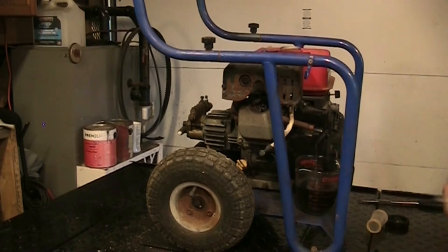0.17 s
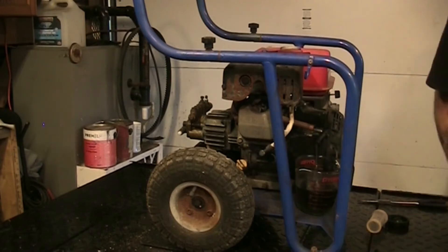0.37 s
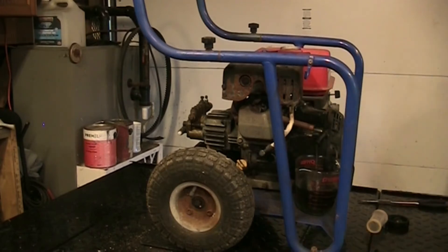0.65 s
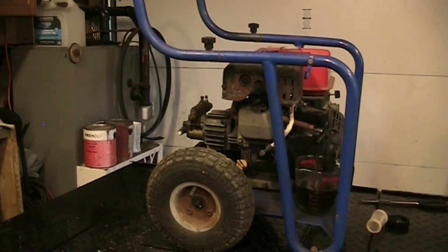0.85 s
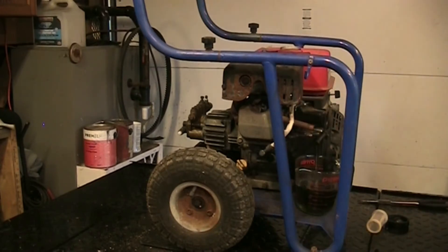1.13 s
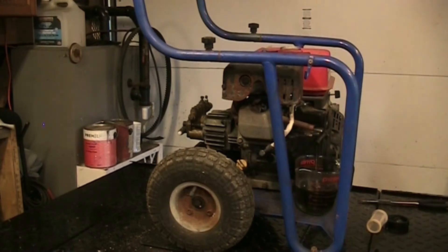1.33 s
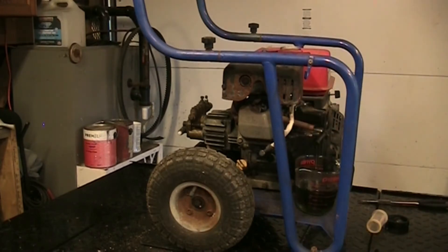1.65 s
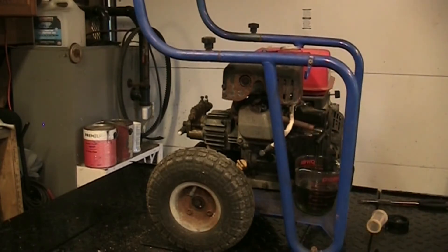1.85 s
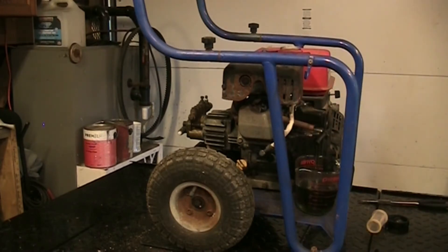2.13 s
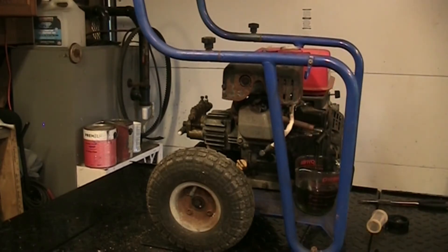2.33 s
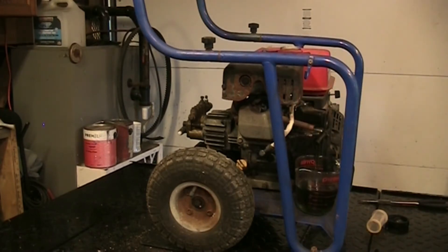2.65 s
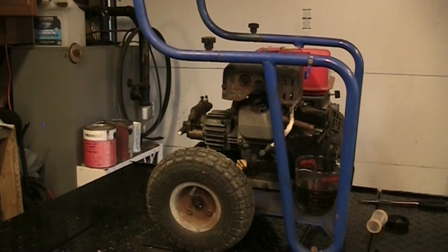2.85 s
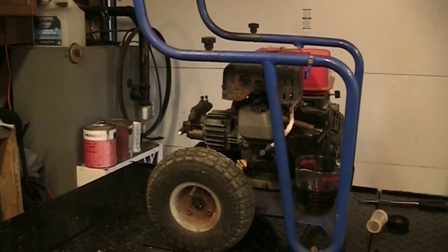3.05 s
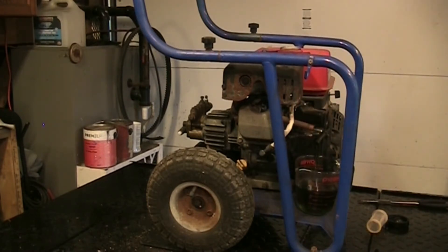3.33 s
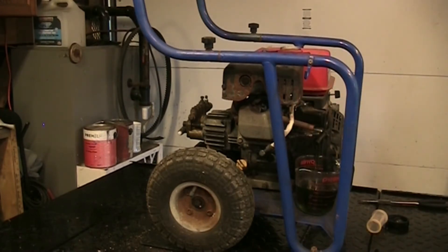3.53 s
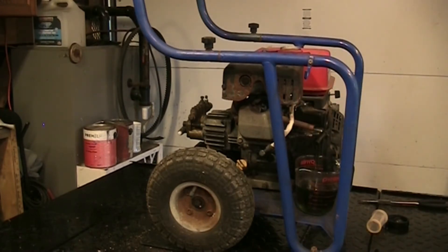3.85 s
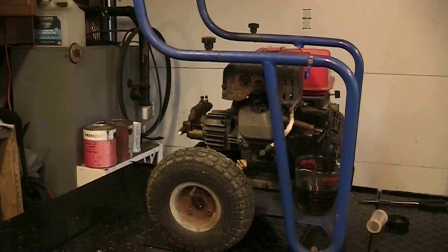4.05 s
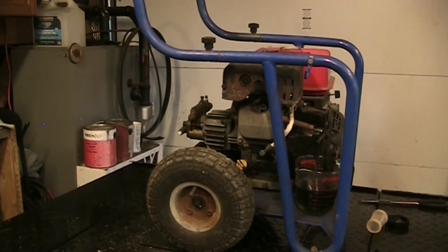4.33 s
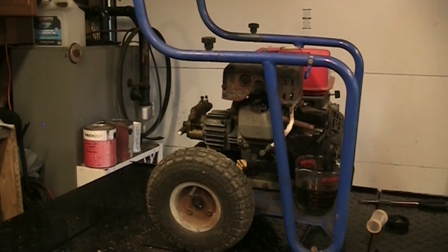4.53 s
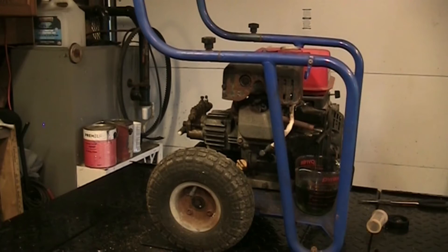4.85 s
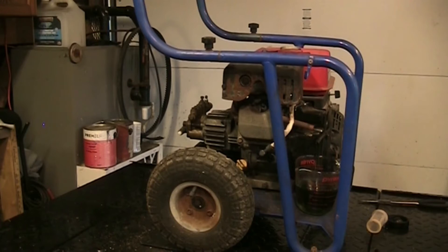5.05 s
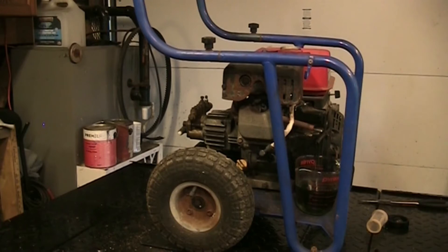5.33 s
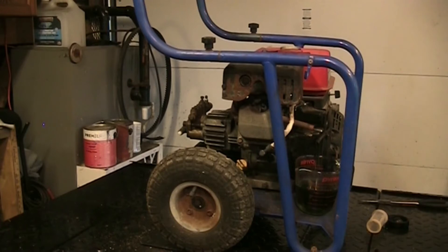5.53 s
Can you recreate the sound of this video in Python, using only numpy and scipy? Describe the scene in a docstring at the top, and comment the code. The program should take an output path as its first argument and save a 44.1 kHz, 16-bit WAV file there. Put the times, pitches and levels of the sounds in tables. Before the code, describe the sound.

In a small, quiet workshop, liquid drips from an engine into a glass cup: bright plinks and dry ticks at first, then softer bubbly patter. Someone nearby bumps and steps; two hard knocks stand out near 1.3 and 3.3 seconds. Just after 5 seconds a metal tool scrapes down among small thuds. Wide stereo camera microphone, short hard room echo, faint hiss.

```python
"""A quiet workshop, small and hard-walled: fuel drips from a small engine into a glass cup.
Each drop traps bubbles that pip as gliding sines and rings the glass; splash ticks add bright spray.
Someone nearby steps and knocks (ringing boards and a crack) and sets a metal tool down (scrape and ring).
Behind lie faint room hiss, a high rustle and a wavering low hum. Random decaying echoes smear the blows
and drips on their way to a camera's wide stereo microphone."""
import sys
import numpy as np
from scipy import signal
from scipy.fft import rfft, irfft, next_fast_len
from scipy.io import wavfile
from scipy.ndimage import uniform_filter1d

SR = 44100
rng = np.random.default_rng(int(sys.argv[2]) if len(sys.argv) > 2 else 0)


def unload_wav(signal):
    """Save mono or channel-first audio to the path in sys.argv[1] as 16-bit WAV at rate SR, clipped to [-1, 1]."""
    wavfile.write(
        sys.argv[1],
        SR,
        np.round(np.clip(np.atleast_2d(signal).T, -1, 1) * 32767).astype(np.int16),
    )


N = 250387
SIZE = 16384  # samples kept of each single sound and echo response
T = np.arange(SIZE) / SR


def undb(db):
    """Turn decibels into an amplitude factor."""
    return 10 ** (np.asarray(db) / 20)


def fade(t60):
    """Exponential decay that falls 60 dB in t60 seconds."""
    return np.exp(-np.log(1000) * T / t60)


def colour(x, table):
    """Filter along the last axis by (frequency [Hz], gain [dB]) points, joined on a log frequency axis."""
    hz, db = np.transpose(table)
    f = np.maximum(np.fft.rfftfreq(x.shape[-1], 1 / SR), 1)
    gain_db = np.interp(np.log(f), np.log(np.maximum(hz, 1)), db)
    return irfft(rfft(x) * undb(gain_db), x.shape[-1])


def unit(x):
    """Scale to an RMS of one."""
    return x / np.sqrt(np.mean(x ** 2))


def walk(rate):
    """Random levels held 1 / rate s and slewed twice."""
    hold = int(SR / rate)
    steps = np.repeat(rng.standard_normal(N // hold + 1), hold)
    return uniform_filter1d(uniform_filter1d(steps, hold), hold)[:N]


def ring(modes, scatter_db, swell=.1):
    """Decaying sines that swing up over swell cycles; every blow stirs them in another mix."""
    chance = rng.standard_normal((len(modes), 2))
    total = 0
    for (hz, db, t60), (stir, sign) in zip(modes, chance):
        swing = np.sign(sign) * np.sin(2 * np.pi * hz * T) * (1 - np.exp(-T * hz / swell))
        total = total + undb(db + scatter_db * stir) * swing * fade(t60)
    return total


def bubble(hz, ring_s, glide=0.0067):
    """A trapped bubble swells for a cycle or two, pips and rises a little as it nears the surface."""
    swell = 1 - np.exp(-T * hz / 0.3)
    rising_time = T + glide * T ** 2 / (2 * ring_s)
    return swell * np.sin(2 * np.pi * hz * rising_time) * fade(max(ring_s, .002))


FOLLOWER_DB, FOLLOWER_DETUNE = -10, 0.078  # level of trailing bubbles, full width of their relative pitch spread
FOLLOWER_S = .03  # they trail by 0.18 to 1.18 times this


def burst(hz, ring_s, glide):
    """A bubble and two smaller ones that follow it, a little off its pitch."""
    followers = 0
    for delay, detune, level in rng.random((2, 3)):
        small = bubble(hz * (1 + FOLLOWER_DETUNE * (detune - .5)), 0.012, glide)
        followers = followers + np.roll(small, int((0.18 + delay) * FOLLOWER_S * SR)) * level
    return bubble(hz, ring_s, glide) + undb(FOLLOWER_DB) * followers


# glass cup: ring of the cup before its level is set: (frequency [Hz], level [dB], t60 [s])
GLASS = [(2360, -14, 0.025), (3000, -25.5, 0.048), (3450, -17.5, 0.11), (3580, -2, 0.019),
         (5100, -26, 0.0069), (6940, -8, 0.0077)]
# ring against the bubble [dB], weaker for bubbles below the cup's note [Hz]
GLASS_DB, GLASS_DB_PER_OCTAVE, CUP_NOTE_HZ = -8.5, 5.5, 3520
# drops in the cup that stand out: (time [s], level [dB], bubble pitch [Hz], bubble ring t60 [s])
DROPS = [(0.0492, -22, 3730, 0.031), (0.052, -39.5, 1730, 0.022), (0.1126, -37.5, 3610, 0.013),
         (0.1584, -37.5, 2360, 0.018), (0.1987, -42, 1670, .022), (0.2184, -34.5, 1790, 0.068),
         (0.2339, -33, 2254, 0.043), (0.236, -41, 3670, 0.015), (0.2636, -27, 1182, 0.049),
         (0.2861, -28.5, 1290, 0.027), (0.3756, -46, 2360, .021), (0.396, -43, 1474, 0.041),
         (0.4889, -34.5, 1236, 0.014), (0.7656, -47, 4190, .054), (0.871, -37.5, 1306, 0.078),
         (0.8959, -33.5, 1460, 0.029), (1.0003, -35, 3450, .014), (1.0409, -38.5, 3580, 0.027),
         (1.1151, -34.5, 2360, 0.027), (1.195, -41.5, 2360, 0.0064), (1.409, -35, 2360, 0.013),
         (1.4638, -29.5, 3600, 0.02), (1.5285, -43, 2200, 0.014), (1.599, -37.5, 3650, 0.02),
         (1.6114, -40.5, 2110, 0.017), (1.645, -39.5, 1772, 0.09), (1.8218, -44.5, 3850, 0.016),
         (1.8828, -36.5, 2350, 0.028), (2.043, -45, 1170, 0.046), (2.2761, -37.5, 2870, 0.02),
         (2.35, -48.5, 2550, 0.028), (2.372, -53, 3150, .016), (2.3935, -45.5, 3700, 0.04),
         (2.431, -51, 2500, 0.025), (2.608, -41, 2520, .023), (2.76, -36, 3000, 0.019),
         (2.8183, -45, 3020, 0.012), (2.8806, -47.5, 2480, .015), (2.9357, -48.5, 3450, .026),
         (3.0356, -43, 2580, .021), (3.0585, -43, 3450, 0.031), (3.18, -40, 3450, 0.035),
         (3.225, -43, 2000, 0.004), (3.503, -45, 3100, .023), (3.5594, -43, 3000, 0.031),
         (3.6617, -42.5, 3580, .018), (3.7314, -46.5, 3580, 0.023), (3.8648, -36.5, 2360, 0.03),
         (4.0002, -50, 2530, 0.032), (4.0871, -48.5, 3480, 0.022), (4.14, -42.5, 3000, 0.057),
         (4.1625, -40, 3450, 0.017), (4.3919, -44.5, 3150, 0.013), (4.4498, -46.5, 3340, .018),
         (4.6738, -43, 3564, 0.029), (4.8405, -46, 2690, 0.019), (4.922, -43.5, 3450, 0.034),
         (4.996, -47, 2900, 0.022), (5.3662, -44.5, 3520, 0.018), (5.4052, -42, 3550, 0.029),
         (5.472, -46, 3800, 0.016), (5.6443, -44, 3630, .018)]


def drops():
    """Each loud drop pips a burst of bubbles and rings the glass; heard almost central."""
    out = np.zeros((2, N))
    for s, db, hz, ring_s in DROPS:
        glass_db = GLASS_DB + GLASS_DB_PER_OCTAVE * min(np.log2(hz / CUP_NOTE_HZ), 0)
        drop = burst(hz, ring_s, glide=0.013) + undb(glass_db) * ring(GLASS, scatter_db=5.5)
        add(out, s, db, drop, echoes(wet_db=-27.5, pan_db=0.4, wide_db=-1.0))
    return out


# t60 of a tick at the middling level, growing for softer ones [per dB]
TICK_RING_S, TICK_RING_PER_DB, MIDDLING_TICK_DB = 0.0024, 0.1344, -42
SPRAY_DB = -12  # factor on the spray beside the tick's bubble
# fine spray over a splash: (frequency [Hz], gain [dB])
SPRAY = [(2500, -30), (5000, -58), (9000, 4.5), (14000, 3), (17000, -34)]
# splash ticks at the cup: (time [s], level [dB], centre pitch [Hz])
TICKS = [(0.0498, -32.5, 5800), (0.113, -47, 5400), (0.1995, -39, 7300), (0.2191, -36, 4740),
         (0.3192, -36.5, 6600), (0.3542, -51.5, 6640), (0.4382, -47, 5100), (0.6804, -35, 8430),
         (0.8968, -36.5, 3500), (0.458, -49, 6000), (0.9585, -47.5, 10400), (0.9912, -46.5, 7550),
         (1.071, -45, 7500), (1.0962, -39.5, 5100), (1.1596, -54, 6940), (1.2491, -53, 6600),
         (1.4648, -31.5, 5020), (1.5999, -40, 4600), (2.852, -56, 7000), (3.235, -56, 7000),
         (3.745, -51, 5100), (3.7983, -48.5, 6940), (3.9675, -51, 6270), (4.2755, -60, 6200),
         (4.3824, -62, 6800), (4.6642, -47, 6200), (4.691, -50.5, 5100), (5.017, -47, 7100),
         (5.472, -47.5, 4440), (5.5934, -51, 6860)]


def ticks():
    """A splash tick is a tiny short bubble under a coloured impulse of spray, a little to the right."""
    out = np.zeros((2, N))
    impulse = 1. * (T == T[20])
    spray = colour(impulse, SPRAY) * fade(0.0063)
    for s, db, hz in TICKS:
        ring_s = TICK_RING_S * np.exp(-TICK_RING_PER_DB * (db - MIDDLING_TICK_DB))
        tick = bubble(hz, ring_s) + undb(SPRAY_DB) * spray
        add(out, s, db, tick, echoes(wet_db=-28.5, pan_db=-2.0, wide_db=0.5))
    return out


PATTER_FROM_S = 1.8
PATTER_DB, PATTER_SPREAD_DB = -56, 2.5  # faintest blip; scale of the random rise above it
# pitches the small patter in the cup favours: (frequency [Hz])
CUP_HZ = [2490, 2840, 3100, 3400, 3280]


def patter():
    """Once the cup holds a pool, small bubble bursts fall at random times near its favoured pitches."""
    out = np.zeros((2, N))
    for when, loud, pitch, detune in rng.random((175, 4)):
        hz = CUP_HZ[int(pitch * len(CUP_HZ))] * (1 + 0.13 * (detune - .5))
        s = PATTER_FROM_S + when * ((N - 1) / SR - PATTER_FROM_S)
        db = PATTER_DB - PATTER_SPREAD_DB * np.log(1 - .95 * loud)
        blip = burst(hz, .016, glide=.14)
        add(out, s, db, blip, echoes(wet_db=-25, pan_db=0.0, wide_db=3.0))
    return out


CRACKLE_TO_S = 1.7


def crackle():
    """Fine high splash ticks while the cup is still nearly dry, a little to the left."""
    out = np.zeros((2, N))
    for when, loud, pitch in rng.random((30, 3)):
        tick = bubble(5500 * 2.23 ** pitch, 0.0047)
        add(out, when * CRACKLE_TO_S, -60 + 8 * loud, tick, echoes(wet_db=-25.5, pan_db=2.0, wide_db=-20.0))
    return out


def snap(t60):
    """A short noise burst flattened to an even spectrum, starting about 1 ms in."""
    noise = rng.standard_normal(SIZE) * fade(t60)
    spectrum = rfft(np.roll(noise, SR // 1000))
    return irfft(spectrum / np.abs(spectrum), SIZE)


BOARD_SWELL_CYCLES = 1.45  # low boards take longer to swing up
RATTLE_T60_S = .23
# floor and bench boards, before each blow colours them: (frequency [Hz], level [dB], t60 [s])
BOARDS = [(140, -1, .2), (226, -4, .18), (248, 0.1, .18), (301, -9, .16), (404, -1, .17), (447, -1, .16),
          (540, -6, .15), (624, -9, .16)]
# crack of a blow, before its brightness tilt: (frequency [Hz], gain [dB])
CRACK = [(410, -8), (700, -1), (1020, -4.5), (1330, -4.5), (4320, -12), (5540, -16), (6070, -17),
         (6830, -15), (12200, -31), (16000, -46)]
# steps and knocks nearby:
# (time [s], thud level [dB], crack above thud [dB], thud centre [Hz], crack brightness [dB])
KNOCKS = [(0.16, -35.5, -2.5, 450, 1), (0.691, -39, -4, 199, 25), (0.829, -35, -5, 153, -13),
          (0.947, -45.5, 6, 541, -7), (1.293, -8, -7.5, 372, 3), (1.778, -46, -40, 189, -2),
          (1.889, -19.5, -9.5, 373, -3.5), (2.059, -37, -39, 143, -1), (2.162, -36.5, 4.5, 625, 0.5),
          (2.257, -42, 9, 634, -16), (2.507, -30, 7.5, 647, -6.5), (2.628, -39.5, -3, 240, -2),
          (2.673, -32, -6.5, 203, -1), (2.719, -37, -4, 140, -3), (3.337, -7.5, -9, 427, 1.3),
          (4.014, -38.5, -23, 810, 0.1), (4.168, -45.5, -5, 433, 7), (5.016, -31, -7, 370, -8),
          (5.085, -32.5, 4, 513, -6.5), (5.205, -29, -7.5, 457, -32)]


def knocks():
    """A blow rings and rattles the boards near its own pitch, and cracks, bright or dull."""
    out = np.zeros((2, N))
    for s, db, crack_db, hz, tilt_db in KNOCKS:
        push = [(40, -45), (hz / 2.96, -8), (hz, 0), (hz * 2.32, -10), (hz * 12, -40)]
        rattle = undb(8.5) * rng.standard_normal(SIZE) * fade(RATTLE_T60_S)
        boards = ring(BOARDS, scatter_db=3.0, swell=BOARD_SWELL_CYCLES)
        thud = colour(boards + rattle, sorted(push)) * (1 - np.exp(-T / 0.00041))
        crack = colour(colour(snap(.003), CRACK), [(700, -tilt_db), (12000, tilt_db)])
        crack = crack * fade(0.035) * (1 - np.exp(-T / 0.0018))
        thud_room = echoes(wet_db=-38, pan_db=-2.3, wide_db=3.0, lag=2, wall_db=-28.0)
        crack_room = echoes(wet_db=-23, pan_db=-0.5, wide_db=3, lag=2, wall_db=-20)
        add(out, s, db, thud, thud_room)
        add(out, s, db + crack_db, crack, crack_room)
    return out


# ring of the metal tool, before its level is set: (frequency [Hz], level [dB], t60 [s])
TOOL = [(2770, -2, .1), (3112, -4, .1), (3445, -3, .2), (5058, -3, .14), (5376, -3, .12), (6300, -5, .08)]
# scrape of the tool: (frequency [Hz], gain [dB])
TOOL_SCRAPE = [(470, -15), (800, -10.5), (2100, -4), (2770, 2.5), (4180, -10.5), (5510, 0), (8030, -11),
               (9570, -20.5), (10600, -19.5), (11400, -22), (13600, -21), (16000, -52)]
# the tool touches down nearby: (time [s], level [dB], ring against scrape [dB])
CLINKS = [(5.1073, -25, -29), (5.1849, -25.5, -12), (5.2069, -28, -13), (5.2324, -34, -15)]


def tool():
    """Metal modes ring briefly over a bright scrape of coloured noise."""
    out = np.zeros((2, N))
    for s, db, ring_db in CLINKS:
        scrape = colour(snap(0.013), TOOL_SCRAPE) * fade(0.06)
        scrape = scrape / np.abs(scrape).max()
        metal = ring(TOOL, scatter_db=2.0)
        add(out, s, db, scrape + undb(ring_db) * metal, echoes(wet_db=-21, pan_db=0.0, wide_db=4.5))
    return out


HISS_DB, HISS_SINK_DB_PER_S = -53, 0.74  # start level and steady fall of the room hiss
# room hiss in the middle of the stereo picture: (frequency [Hz], gain [dB])
HISS_MID = [(35, -101), (60, -0.5), (113, 0.5), (290, -4.5), (350, -7), (432, -3.5), (1990, -13.5),
            (3500, -20), (4320, -20.5), (5730, -21), (14000, -32), (15400, -32), (16500, -67)]
# room hiss at the sides: (frequency [Hz], gain [dB])
HISS_SIDE = [(35, -39), (60, -5), (252, -1.5), (559, -3.5), (1300, -9.5), (3500, -18), (6300, -22.5),
             (11600, -34), (12700, -66), (14300, -80), (16500, -51)]


def hiss():
    """Wide coloured room noise that wavers and slowly sinks."""
    n = next_fast_len(N)
    mid = unit(colour(rng.standard_normal(n), HISS_MID)[:N])
    side = unit(colour(rng.standard_normal(n), HISS_SIDE)[:N]) * undb(3.0)
    level_db = HISS_DB - HISS_SINK_DB_PER_S * np.arange(N) / SR
    return (mid + side * np.array([[1], [-1]])) * undb(level_db + 1.5 * walk(6.56))


RUSTLE_DB, RUSTLE_SINK_DB, RUSTLE_SINK_S = -57.5, 16, 1.35  # start, total fall, time constant of the fall
RUSTLE_FLICKER_DB = 5  # factor on a smoothed random walk


def rustle():
    """High noise, independent left and right, that dies down and flickers."""
    noise = rng.standard_normal((2, next_fast_len(N)))
    treble = unit(colour(noise, [(4000, 1), (7500, -15.0), (11000, -6.0), (16000, -22)])[:, :N])
    level_db = RUSTLE_DB - RUSTLE_SINK_DB * (1 - np.exp(-np.arange(N) / SR / RUSTLE_SINK_S))
    return treble * undb(level_db + RUSTLE_FLICKER_DB * walk(25.3))


# wavering hum in the background, before the left-right offset: (time [s], level [dB])
HUM = [(0.0, -64), (0.22, -55.5), (0.45, -63), (1.0, -63), (1.2, -55.5), (1.72, -55), (2.09, -73),
       (2.34, -60.5), (2.61, -75), (3.07, -68), (3.6, -75), (4.2, -77), (4.73, -71), (5.1, -70),
       (5.68, -80)]


def hum():
    """A low sine whose pitch and level waver, stronger on the right."""
    hum_hz = 47.5 + 3.65 * walk(23.4)
    tone = unit(np.sin(2 * np.pi * np.cumsum(hum_hz) / SR)) * undb(0.7 * walk(14))
    level_db = np.interp(np.arange(N) / SR, *np.transpose(HUM))
    return tone * undb(level_db + np.array([[-4.5], [3.0]]))


ROOM_T60_S, TREBLE_T60_S = 0.28, 0.22
WALL_S, WALL_DB = .0100, -7.5  # slap off the near wall
# echoes as the two microphone ports hear them, before each spot's width:
# (frequency [Hz], side above mid [dB])
ECHO_SIDE = [(100, -1), (400, -17), (1000, -15), (2500, -8.5), (6000, -5.5), (14000, -11)]


def echoes(wet_db, pan_db, wide_db, lag=0, wall_db=WALL_DB):
    """Stereo room response from one spot: direct sound, near-wall slap, clumpy echoes, treble dying first."""
    mid, side = rng.standard_normal((2, SIZE))
    pair = mid + undb(wide_db) * colour(side, ECHO_SIDE) * np.array([[1], [-1]])
    low = signal.sosfilt(signal.butter(1, 3000, fs=SR, output="sos"), pair)
    tail = low * fade(ROOM_T60_S) + (pair - low) * fade(TREBLE_T60_S)
    tail = tail * (1 - np.exp(-T / 0.0016))
    clumps = uniform_filter1d(np.repeat(rng.standard_normal(SIZE // 128), 128), 128)
    tail = tail * undb(wet_db + 1.84 * clumps)
    tail[0, lag] += 1  # with a lag in samples, the left port hears the sound later
    tail[1, 0] += 1
    tail[:, int(WALL_S * SR)] += undb(wall_db)
    return tail * undb(np.array([[pan_db], [-pan_db]]) / 2)  # positive pan_db favours the left


def add(out, s, db, sound, room):
    """Play one sound through the room from s on, the RMS of its first 20 ms set 10 dB below db."""
    end_fade = np.clip((T[-1] - T) / 0.11, 0, 1)
    heard = signal.fftconvolve(sound[None], room, axes=1)[:, :SIZE] * end_fade
    start = int(s * SR)
    early = np.sqrt(np.mean(heard[:, :SR // 50].mean(0) ** 2))
    out[:, start:start + SIZE] += (heard * undb(db - 10) / early)[:, :N - start]


def scene():
    """Sum the cup, the steps, knocks and tool nearby, and the background of the room."""
    cup = drops() + ticks() + patter() + crackle()
    movement = knocks() + tool()
    background = hiss() + rustle() + hum()
    return cup + movement + background


TOP_HZ = 16200


def record(dry):
    """The camera cuts the top with a steep low-pass."""
    return signal.sosfilt(signal.ellip(10, .2, 80, TOP_HZ, fs=SR, output="sos"), dry)


dry = scene()
out = record(dry)
unload_wav(out)
```